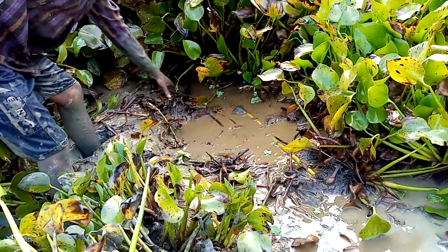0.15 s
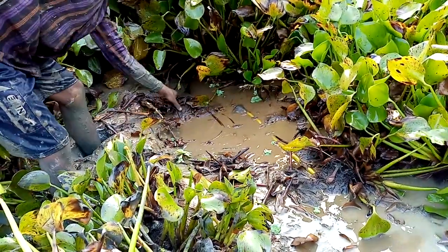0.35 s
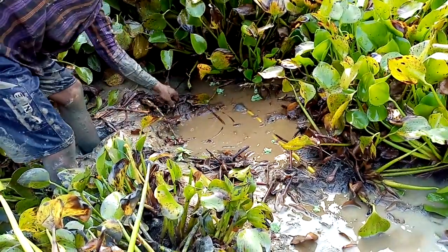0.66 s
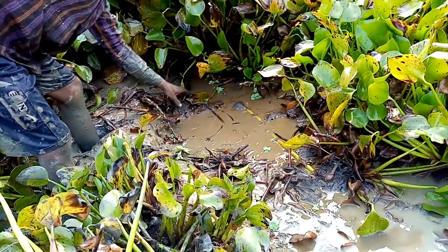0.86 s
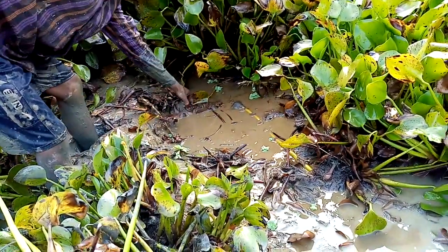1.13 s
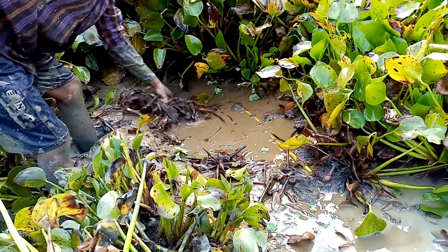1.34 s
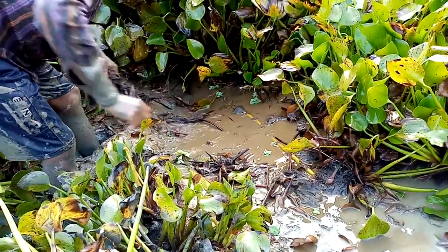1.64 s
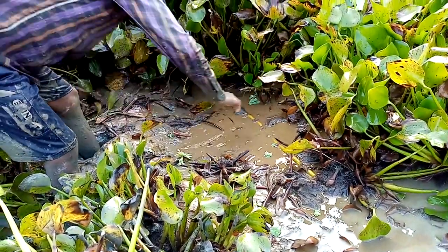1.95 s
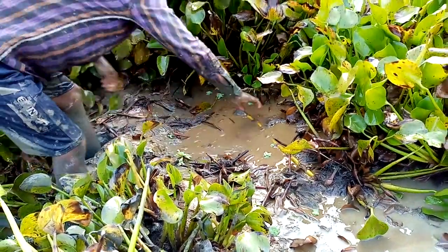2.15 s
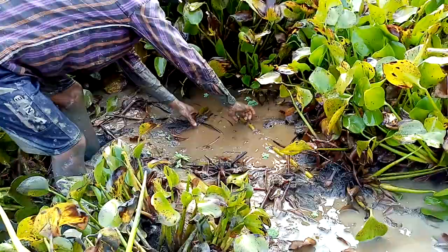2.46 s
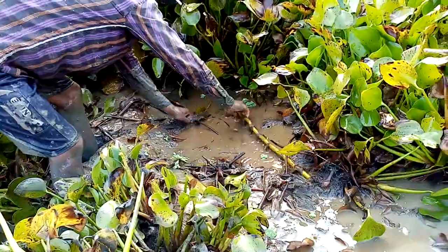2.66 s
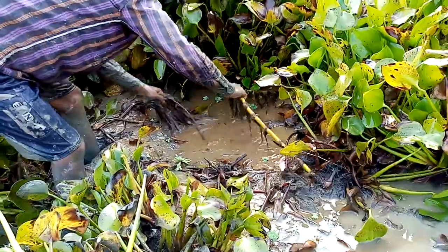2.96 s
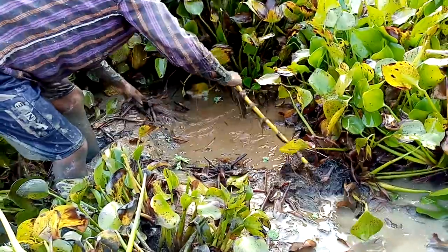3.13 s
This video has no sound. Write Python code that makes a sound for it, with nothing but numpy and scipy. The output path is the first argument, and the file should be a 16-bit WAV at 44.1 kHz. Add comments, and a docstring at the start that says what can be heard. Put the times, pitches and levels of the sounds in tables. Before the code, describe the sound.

Hands digging in shallow muddy water, heard close outdoors. Soft wet crackles and small squelches until about 1 s, then stronger squelching; from 1.4 to 2 s a clump lifts with bubbly plops, trickles and droplets ticking on leaves. Lighter plops around 2.3 s, a lull, then a bright, crisp stalk snap at 3.0-3.2 s. Far behind, an engine thuds about twelve times a second under faint hiss and faint falling, birdlike tones.

```python
"""Digging in a drained pond.

Hands dig through wet mud and water plants: bursting films and bubbles crackle, short noise bands squelch,
gliding damped tones plop as muddy water trickles off a lifted clump, and filtered droplets tick on leaves.
Near the end a stalk snaps close by in a run of impulses. Far away a single-cylinder engine thuds steadily,
with faint falling tones and a patchy hiss of air. The right microphone is the brighter one."""
import sys
import numpy as np
from scipy import signal
from scipy.fft import rfft, irfft, next_fast_len
from scipy.io import wavfile
from scipy.ndimage import uniform_filter1d, map_coordinates

SR = 44100
rng = np.random.default_rng(int(sys.argv[2]) if len(sys.argv) > 2 else 0)


def digitize_waveform(pressure):
    """Quantize a signal to 16-bit integers and store it at the path in sys.argv[1].

    Rows of a 2-D input are taken as channels; values are limited to [-1, 1].
    """
    field = np.atleast_2d(pressure).T
    bounded = np.clip(field, -1, 1)
    quanta = np.round(bounded * 32767).astype(np.int16)
    wavfile.write(sys.argv[1], SR, quanta)


N = 145530
TOP_HZ = 15800


def amp(db):
    """Decibels to gain."""
    return 10 ** (np.asarray(db) / 20)


def unit(x):
    """Scale to rms 1."""
    return x / np.sqrt(np.mean(x ** 2) + 1e-20)


def gain(points):
    """(frequency [Hz], gain [dB]) points as a response on a log axis."""
    point_hz, point_db = np.transpose(points)
    return lambda hz: amp(np.interp(np.log(hz + 1), np.log(point_hz + 1), point_db))


def curve(rows):
    """(time [s], value) rows as one value per sample."""
    return np.interp(np.arange(N) / SR, *np.transpose(rows))


def filtered(x, response):
    """Multiply the spectrum of x by a response of frequency."""
    n = x.shape[-1]
    padded = next_fast_len(n + 8192)
    spectrum = rfft(x, padded) * response(np.fft.rfftfreq(padded, 1 / SR))
    return irfft(spectrum, padded)[..., :n]


def ringing(x, points):
    """Causal minimum-phase colour, for blows: no sound before the impact."""
    size = 8192
    cepstrum = irfft(np.log(gain(points)(np.fft.rfftfreq(size, 1 / SR))))
    causal = np.r_[cepstrum[0], 2 * cepstrum[1:size // 2]]
    ir = irfft(np.exp(rfft(causal, size)))
    return signal.fftconvolve(x, ir[None], axes=1)[:, :N]


def add(track, start_s, sound):
    """Mix a sound in at start_s."""
    i = max(0, round(start_s * SR))
    part = track[..., i:i + sound.shape[-1]]
    part += sound[..., :part.shape[-1]]


def noise(colour):
    """Coloured noise, unrelated at the two microphones, rms 1."""
    return unit(filtered(rng.standard_normal((2, N)), gain(colour)))


def pops(per_s, spread_db):
    """Random impulses of either sign and uneven size."""
    hits = rng.random(N) < per_s / SR
    signs = rng.choice([-1, 1], N)
    sizes = amp(spread_db * np.minimum(rng.exponential(size=N), 4))
    return hits * signs * sizes


def tail(x, t60):
    """Diffuse reflections as decaying noise, different at each microphone."""
    t = np.arange(SR // 3) / SR
    onset = 1 - np.exp(-t / 0.000473)
    ir = rng.standard_normal((2, len(t))) * amp(-60 * t / t60) * onset
    return signal.fftconvolve(np.atleast_2d(x), ir / np.linalg.norm(ir[0]), axes=1)[:, :N]


def wobble(per_s):
    """A smooth random curve through per_s random points a second."""
    return map_coordinates(rng.standard_normal(N // 100), [np.arange(N) * per_s / SR], mode="wrap")


PATCH_DB = 3.5


def patchy(x):
    """Random patches of gain, brief and narrow in pitch; rms 1."""
    z = signal.stft(x, nperseg=256)[2]
    field = uniform_filter1d(rng.standard_normal(z.shape[1:]), size=7, axis=0)
    field = uniform_filter1d(field, size=4, axis=1)
    return unit(signal.istft(z * amp(PATCH_DB * unit(field)), nperseg=256)[1][:, :N])


ATTACK_CYCLES = 1.58


def bubble(hz, t60, rise):
    """A damped ring whose pitch glides by rise [octaves/s], upward in most air pockets."""
    t = np.arange(int(t60 * SR) + 2) / SR
    tone = np.sin(2 * np.pi * np.cumsum(hz * 2 ** (rise * t)) / SR)
    return tone * amp(-60 * t / t60) * (1 - np.exp(-t * hz / ATTACK_CYCLES))


def bubbles(per_s, spread_db, hz, octaves, cycles, rise):
    """A swarm of bubbles of random size and pitch, each with a t60 of so many cycles; rms 1."""
    out, sizes = np.zeros(N), pops(per_s, spread_db)
    pitch_hz = np.minimum(hz * 2 ** (octaves * rng.standard_normal(N)), TOP_HZ)
    for i in np.flatnonzero(sizes):
        add(out, i / SR, sizes[i] * bubble(pitch_hz[i], cycles / pitch_hz[i], rise))
    return unit(out)


# wet crackle of mud and roots, before CRACKLE_GAIN_DB: (time [s], level [dB])
CRACKLE_LEVEL = [(0, -62.5), (.1, -66), (.16, -61), (.22, -69), (.27, -63), (.39, -66), (.48, -63),
                 (.6, -69), (.72, -70), (.86, -70.5), (1.0, -66), (1.08, -57), (1.13, -64), (1.2, -57.5),
                 (1.33, -60), (1.42, -54.5), (1.455, -54), (1.48, -59), (1.56, -56.5), (1.75, -61),
                 (1.9, -56.5), (1.99, -53.5), (2.11, -64), (2.23, -68), (2.31, -60), (2.45, -64),
                 (2.56, -68.5), (2.68, -71.5), (2.88, -68.5), (2.96, -60.5), (3.15, -53.5), (3.3, -64)]
# colour of bursting films and wet wash: (frequency [Hz], gain [dB])
CRACKLE_COLOUR = [(1200, -31.5), (2000, -40), (2500, -18.5), (3300, -8), (4600, -8), (5600, -2),
                  (6600, 3.5), (8000, -12), (10000, -9), (13000, -19.5), (15500, -11)]
# colour of fine spray and droplets: (frequency [Hz], gain [dB])
SPRAY_COLOUR = [(3000, -52.5), (7000, -25), (9000, -5), (15000, 9)]
CRACKLE_GAIN_DB, FILMS_PER_S, FILM_SPREAD_DB, WASH_DB = 3, 900, 3.5, -0.5
FIZZ_DB, FIZZ_PER_S, FIZZ_HZ, FIZZ_SPREAD_DB, CLUMP_DB = -3, 600, 5700, 2.5, 2.8
SPRAY_DB, SPRAY_PER_S, SPRAY_SPREAD_DB = -3.5, 110, -3.5


def crackle():
    """Films of mud and tiny bubbles burst in clumps, with fine spray, over a wet wash."""
    films = unit(filtered(pops(FILMS_PER_S, FILM_SPREAD_DB), gain(CRACKLE_COLOUR)))
    fizz = bubbles(FIZZ_PER_S, FIZZ_SPREAD_DB, FIZZ_HZ, octaves=0.3287, cycles=94, rise=4.4)
    spray = unit(filtered(pops(SPRAY_PER_S, SPRAY_SPREAD_DB), gain(SPRAY_COLOUR)))
    clumping = amp(CLUMP_DB * wobble(39.937))
    grains = clumping * (films + amp(FIZZ_DB) * fizz + amp(SPRAY_DB) * spray)
    wash = amp(WASH_DB) * patchy(noise(CRACKLE_COLOUR))
    wet = unit(grains + tail(grains, t60=.01)) + wash
    return amp(CRACKLE_GAIN_DB + curve(CRACKLE_LEVEL)) * wet


# stirred water, before GURGLE_DB and SLOSH_DB: (time [s], level [dB])
STIR_LEVEL = [(0.0, -78.5), (0.05, -74.5), (0.6, -84.5), (.9, -74.5), (1.07, -71), (1.19, -75.5),
              (1.54, -67), (1.78, -66.5), (1.8, -61.5), (1.85, -68.5), (1.94, -63.5), (2.2, -76),
              (2.34, -69), (2.5, -67.5), (2.64, -79.5), (2.86, -82), (3.14, -66.5), (3.3, -69.5)]
# colour of sloshing water: (frequency [Hz], gain [dB])
SLOSH_COLOUR = [(250, -60.5), (500, 0.5), (900, -8), (1250, -15), (1800, 3), (2500, 4.5), (4000, 5.5),
                (8000, -24.5)]
GURGLE_DB, SLOSH_DB = -1, 2.5
BUBBLES_PER_S, BUBBLE_SPREAD_DB, BUBBLE_HZ = 650, 2, 1672.3
BUBBLE_OCTAVES, BUBBLE_CYCLES = .42, 34


def stirred_water():
    """Many small bubbles gliding up in pitch, in sloshing water of patchy noise."""
    gurgle = bubbles(BUBBLES_PER_S, BUBBLE_SPREAD_DB, BUBBLE_HZ, BUBBLE_OCTAVES, BUBBLE_CYCLES, rise=6.25)
    gurgle = amp(GURGLE_DB) * unit(gurgle + tail(gurgle, t60=0.024))
    slosh = amp(SLOSH_DB) * patchy(noise(SLOSH_COLOUR))
    return amp(curve(STIR_LEVEL)) * (gurgle + slosh)


# colour of the background air: (frequency [Hz], gain [dB])
AIR_COLOUR = [(300, -0.5), (550, -1.5), (900, -5.5), (1400, -9), (1850, -3), (2600, -37), (4000, -1),
              (5200, 9), (6500, 8), (8000, -9.5), (13000, -27.5), (15500, -5.5)]
AIR_DB = -65


def air():
    """Background hiss of patchy coloured noise."""
    return amp(AIR_DB) * patchy(noise(AIR_COLOUR))


# colour of thud, echo and rumble: (frequency [Hz], gain [dB])
EXHAUST_COLOUR = [(25, -27.5), (42, -31.5), (60, -7.5), (80, -5), (145, 0.5), (200, -8), (300, -17.5),
                  (420, -23.5), (900, -45.5), (3000, -61.5)]
# colour of the exhaust puff: (frequency [Hz], gain [dB])
PUFF_COLOUR = [(100, -22), (200, -3.5), (300, 0.5), (420, -6), (700, -57.5), (2000, -68)]
FIRINGS_PER_S, FIRST_FIRING_S, ENGINE_DB = 12.04, .0045, -62.5
ECHO_S, ECHO_DB, RUMBLE_DB, RUMBLE_T60_S = 0.017655, -4.5, -31, 0.768
PUFF_DB, PUFF_PEAK_S, PUFF_WIDTH_S, PUFF_UNEVEN_DB = -13.5, 0.0145, 0.0143, 1.5


def engine(uneven_db=2.5):
    """One exhaust thud and a rough puff per firing, with an echo and a rumble from the fields."""
    blows, gate, t = np.zeros((1, N)), np.zeros(N), np.arange(SR // 4) / SR
    puff_shape = np.exp(-((t - PUFF_PEAK_S) / PUFF_WIDTH_S) ** 2)
    for s in np.arange(FIRST_FIRING_S, N / SR, 1 / FIRINGS_PER_S):
        thud = -amp([rng.normal(0, uneven_db)])
        add(blows, s, thud)
        add(blows, s + ECHO_S + rng.normal(0, 0.00195), thud * amp(ECHO_DB))
        add(blows, s, amp(RUMBLE_DB - 60 * t / RUMBLE_T60_S) * rng.standard_normal(len(t)))
        add(gate, s, amp(rng.normal(0, PUFF_UNEVEN_DB)) * puff_shape)
    puffs = unit(gate * noise(PUFF_COLOUR)[0])
    return amp(ENGINE_DB) * (unit(ringing(blows, EXHAUST_COLOUR)) + amp(PUFF_DB) * puffs)


# plops and squeaks of air pockets, and drips:
# (time [s], level [dB], pitch [Hz], t60 [s], rise [octaves/s])
PLOPS = [(.04, -71.5, 623, 0.105, 23), (0.068, -56.5, 1084, 0.0317, 17), (.2, -60, 1070, 0.0264, 6),
         (0.305, -58, 4570, 0.125, -6.5), (0.351, -65.5, 1806, 0.0506, -11),
         (0.425, -61.5, 1768, 0.0404, 10.5), (0.638, -68, 1095, 0.16, 2.5), (.968, -51, 3290, 0.021, 6),
         (1.096, -45.5, 3192, 0.0255, -0.5), (1.411, -47, 2090, 0.0212, -2.5),
         (1.073, -46, 7570, 0.0073, 5.5), (1.082, -44, 7800, 0.0097, -0.5),
         (1.091, -46.5, 7660, 0.0087, 0.5), (1.422, -34, 5440, 0.0126, 8), (1.455, -40.5, 6680, 0.016, 0.5),
         (1.492, -62, 1159, 0.061, 5.5), (1.521, -53, 1148, 0.065, 10.5), (1.546, -38.5, 1766, 0.0185, 19),
         (1.572, -48, 1775, 0.0265, 11.5), (1.579, -56.5, 1146, 0.051, 9.5),
         (1.684, -48.5, 927.6, 0.055, 7), (1.684, -43.5, 1761, 0.019, 9), (1.737, -53.5, 1205, 0.036, 11.5),
         (1.76, -48.5, 1512, 0.0265, -1), (1.796, -48, 1561, 0.085, 5.5), (1.797, -41.5, 881, 0.022, 12.5),
         (1.798, -44.5, 2334, 0.0235, -2.5), (1.83, -47.5, 615.5, 0.0567, 5),
         (1.834, -79, 414, 0.064, -1.5), (1.842, -54, 733, 0.046, 14), (1.858, -52, 973, 0.039, -7),
         (1.876, -48, 853, 0.0236, 2), (1.927, -45, 1828, 0.033, -1), (1.98, -51, 863, 0.034, 9),
         (2.28, -59, 796, 0.027, 5), (2.311, -51, 2451, 0.0425, 5), (2.337, -48.5, 865, 0.0367, 16),
         (2.351, -41.5, 1314, 0.0332, 20), (2.943, -39.5, 2980, 0.0192, 5.5),
         (3.065, -54, 1970, 0.038, 14.5), (3.092, -53.5, 913, 0.04, -15.5), (3.12, -51, 1150, 0.0315, 7.5),
         (3.131, -58, 1400, 0.023, 18.5), (3.204, -42.5, 1670, 0.044, -0.5),
         (3.264, -53.5, 1633, 0.052, 4.5)]
PLOP_ROUGH = .32


def plops():
    """Larger bubbles as damped gliding tones, roughened by the mud."""
    out = np.zeros(N)
    for s, db, hz, t60, rise in PLOPS:
        tone = bubble(hz, t60, rise)
        rough = unit(uniform_filter1d(rng.standard_normal(len(tone)), size=40))
        add(out, s, amp(db) * tone * (1 + PLOP_ROUGH * rough))
    return out


# squelches and sloshes, each peaking a quarter of its length in:
# (time [s], level [dB], centre [Hz], length [s])
SQUELCHES = [(0.118, -52, 4420, 0.033), (0.133, -45.5, 4810, 0.0138), (0.246, -60, 3410, 0.0087),
             (0.25, -51.5, 5890, 0.0128), (0.317, -52.5, 5760, 0.0144), (0.43, -50.5, 5960, 0.0096),
             (0.479, -52, 5000, 0.0086), (0.5, -52, 6040, 0.0095), (0.548, -55.5, 5720, 0.014),
             (0.818, -55.5, 6960, 0.0051), (0.905, -56.5, 5300, 0.034), (1.05, -37, 6300, 0.00615),
             (1.08, -53, 5680, 0.015), (1.175, -48, 5910, 0.0144), (1.239, -52.5, 6200, 0.0126),
             (1.401, -46.5, 5650, 0.0083), (1.418, -48, 5300, 0.0047), (1.433, -46, 5650, 0.0165),
             (1.5197, -41.5, 6000, 0.0043), (1.545, -48, 6190, 0.013), (1.577, -48.5, 5400, 0.0048),
             (1.594, -42, 5970, 0.0087), (1.796, -42.5, 6590, 0.008), (1.874, -50.5, 6000, 0.014),
             (1.922, -43.5, 6070, 0.0197), (1.967, -48.5, 5580, 0.0334), (2.051, -50, 6330, 0.011),
             (2.064, -48, 6370, 0.0117), (2.31, -49, 6190, 0.0204), (2.359, -48.5, 5900, 0.0049),
             (2.428, -52, 7100, 0.0048), (2.44, -53.5, 5780, 0.0207), (2.562, -49.5, 7610, 0.0089),
             (2.94, -51, 6060, 0.0137), (3.008, -43, 4070, 0.00225), (3.027, -30, 6130, 0.00267),
             (3.031, -28.5, 7550, 0.0027), (3.046, -44.5, 4200, 0.0196), (3.02, -44, 6300, 0.0472),
             (3.121, -45, 5560, 0.025), (3.23, -73, 6060, 0.067), (1.343, -61, 2910, 0.147),
             (1.481, -66, 1300, 0.149), (1.797, -55, 1460, 0.03), (1.83, -67.5, 600, 0.055),
             (1.828, -55, 323, 0.027), (1.93, -63, 1410, 0.084), (2.418, -73, 710, 0.064),
             (2.49, -72, 1920, 0.059), (2.271, -67, 1197, 0.18)]
SQUELCH_OCTAVES, SQUELCH_GRAIN_DB = 0.42, 3  # half bandwidth, roughness


def squelches():
    """Short spurts of bursting mud and longer sloshes: grainy noise, each in its own band."""
    out, t = np.zeros((2, N)), np.arange(SR // 3) / SR
    for s, db, hz, length_s in SQUELCHES:
        band = lambda f: 1 / np.sqrt(1 + (np.log2((f + 1) / hz) / SQUELCH_OCTAVES) ** 6)
        grain = amp(SQUELCH_GRAIN_DB * wobble(700)[:len(t)])
        spurt = unit(filtered(rng.standard_normal((2, len(t))) * grain, band))
        u = 4 * t / length_s
        add(out, s, amp(db) * spurt * u * np.exp(1 - u))
    return out


# faint far tones, before flutter and tail:
# (time [s], length [s], start pitch [Hz], end pitch [Hz], level [dB])
FAR_CALLS = [(0.718, .24, 1824, 1581, -75.5), (1.02, 0.141, 1860, 1790, -76.5),
             (1.079, 0.128, 725, 716, -70.5), (2.124, 0.066, 2789, 2651, -67),
             (2.872, 0.167, 622, 590, -76)]
FAR_WAVER, FAR_FLUTTER_DB = .005, 2.5  # FAR_WAVER is a fraction of the pitch


def far_calls():
    """Faint falling tones, perhaps birds, blurred by distance."""
    out = np.zeros(N)
    for s, length_s, start_hz, end_hz, db in FAR_CALLS:
        hz = np.linspace(start_hz, end_hz, int(length_s * SR))
        hz = hz * (1 + FAR_WAVER * wobble(58.8)[:len(hz)])
        tone = np.sin(2 * np.pi * np.cumsum(hz) / SR)
        add(out, s, amp(db) * np.hanning(len(hz)) ** .5 * tone)
    out = out * amp(FAR_FLUTTER_DB * wobble(34.845))
    return out + amp(3) * tail(out, t60=0.33)


# bright ticks of spray on the leaves, before SPRAY_COLOUR: (time [s], level [dB])
TICKS = [(0.809, -50), (1.107, -54.5), (1.181, -44), (1.523, -47), (1.744, -49.5), (1.796, -47),
         (1.923, -44), (2.141, -53.5), (2.313, -46), (2.454, -54.5), (2.566, -51), (2.651, -54.5),
         (2.803, -60), (2.853, -52.5), (2.942, -49), (3.03, -34), (3.182, -42)]
TICK_T60_S = 0.012


def ticks():
    """Single droplets hit the leaves: bright decaying noise bursts."""
    out, t = np.zeros((2, N)), np.arange(SR // 20) / SR
    for s, db in TICKS:
        add(out, s, amp(db - 60 * t / TICK_T60_S) * rng.standard_normal((2, len(t))))
    return filtered(out, gain(SPRAY_COLOUR))


# cracks of the stalk, before SNAP_COLOUR and SNAP_GAIN_DB; the ring gets neither:
# (time [s], level [dB], tearing time constant [s], ring re level [dB])
SNAPS = [(3.0826, -28, 0.00103, -23.5), (3.1033, 1, 0.0069, -7.5), (3.1115, -7.5, 0.0035, -23.5),
         (3.131, -27, 0.0035, -31), (3.152, -18.5, 0.00062, -28.5), (3.1635, -19.5, 0.0019, -23),
         (3.1817, -55.5, 0.00052, -31.5), (3.1902, -23, 0.00086, -24.5), (3.2005, -4.5, 0.00176, -25),
         (3.2629, -27.5, 0.00089, -20.5)]
# colour of the cracks: (frequency [Hz], gain [dB])
SNAP_COLOUR = [(100, -44), (400, -15.5), (900, -25), (1500, -12.5), (2300, -8.5), (3200, -10.5),
               (4200, 0.5), (5600, 7.5), (6600, 3.5), (7800, -6.5), (10000, -8), (15000, -25.5)]
SNAP_GAIN_DB, FIBRE_S = 5, 0.0013  # FIBRE_S: mean gap between fibres, and splinter onset
SPLINTER_DB, SPLINTER_T60_S, SPLINTER_GRAIN = -15, 0.02146, 0.77
STALK_HZ, STALK_T60_S = 3198, 0.01266


def snaps():
    """Fibres of a stalk give way one after another; it splinters and rings briefly."""
    cracks, ring, t = np.zeros((2, N)), np.zeros(N), np.arange(SR // 10) / SR
    for s, db, tear_s, ring_db in SNAPS:
        for k in range(6):
            jitter = min(k, 1) * (rng.random() - .5)  # none on the first fibre
            add(cracks, s + FIBRE_S * (k + jitter), -amp([db]) * np.exp(-k * FIBRE_S / tear_s))
        grain = np.exp(SPLINTER_GRAIN * rng.standard_normal(len(t)))
        splinters = unit(rng.standard_normal((2, len(t))) * grain)
        decay = amp(db + SPLINTER_DB - 60 * t / SPLINTER_T60_S)
        add(cracks, s, decay * splinters * (1 - np.exp(-t / FIBRE_S)))
        add(ring, s, amp(db + ring_db) * bubble(STALK_HZ, STALK_T60_S, 0))
    return amp(SNAP_GAIN_DB) * ringing(cracks, SNAP_COLOUR) + ring


SCATTER_DB, SCATTER_T60_S = -1, 0.0157  # leaves nearby
BANK_DB, BANK_T60_S = -17, 0.066  # pond banks


def scene():
    """Mud and stalk among scattering leaves and banks, over the far background."""
    drops = plops()
    scattered = amp(SCATTER_DB) * tail(drops, SCATTER_T60_S)
    near = drops + scattered + squelches() + ticks() + snaps()
    banks = amp(BANK_DB) * tail(near, BANK_T60_S)
    return near + banks + crackle() + stirred_water() + air() + engine() + far_calls()


# response of the left microphone: (frequency [Hz], gain [dB])
LEFT_MIC = [(100, -2.5), (700, -3), (2200, -4.5), (4400, -7.5), (6500, -16), (8700, -9), (9700, -15.5),
            (11000, -27.5), (15000, -25.5)]
RIGHT_LAG_S = 46 / 44100


def record(dry):
    """The left microphone is duller, the right channel a little late; nothing passes above TOP_HZ."""
    left = filtered(dry[0], gain(LEFT_MIC))
    right = filtered(dry[1], lambda hz: np.exp(-2j * np.pi * hz * RIGHT_LAG_S))
    return filtered(np.array([left, right]), lambda hz: hz < TOP_HZ)


dry = scene()
out = record(dry)
digitize_waveform(out)
```